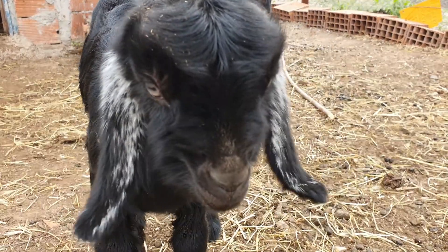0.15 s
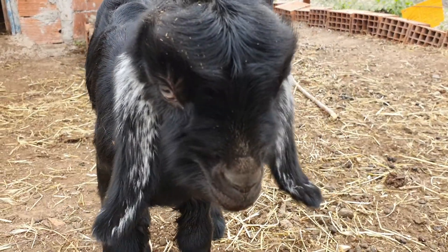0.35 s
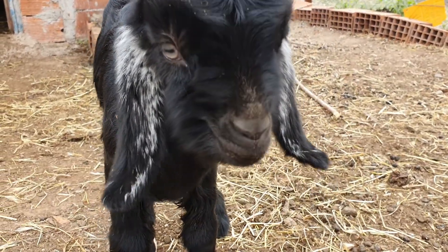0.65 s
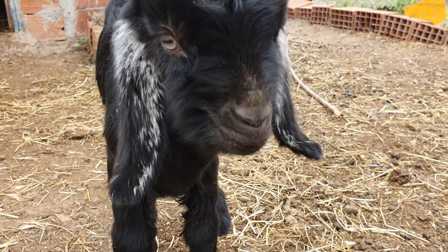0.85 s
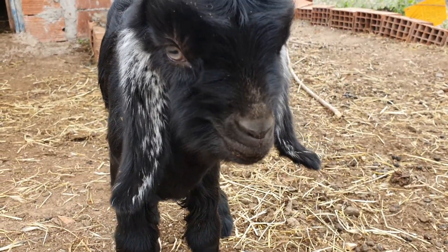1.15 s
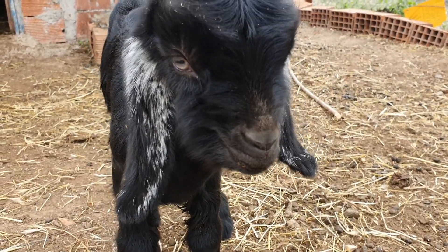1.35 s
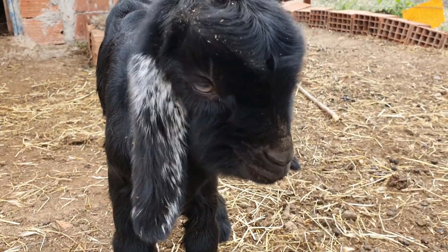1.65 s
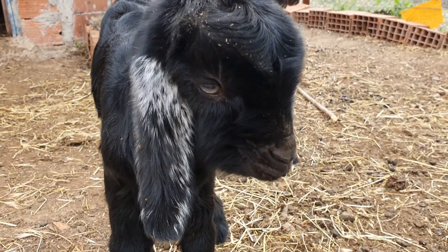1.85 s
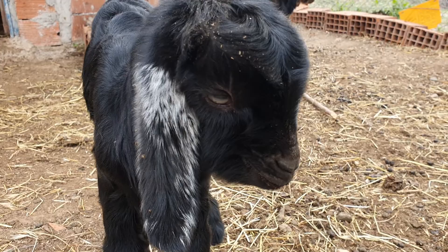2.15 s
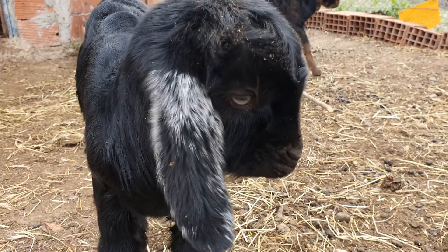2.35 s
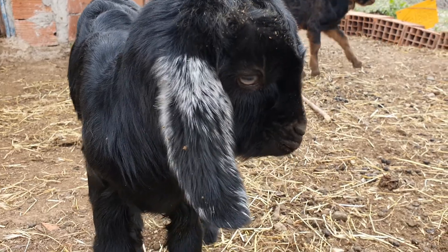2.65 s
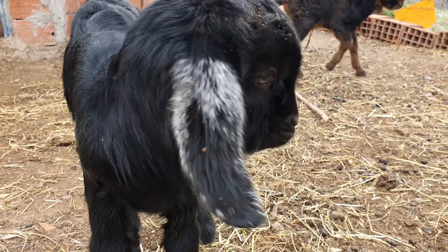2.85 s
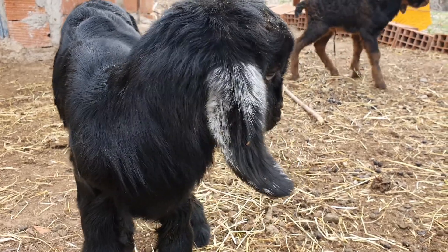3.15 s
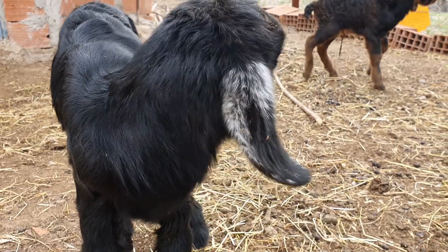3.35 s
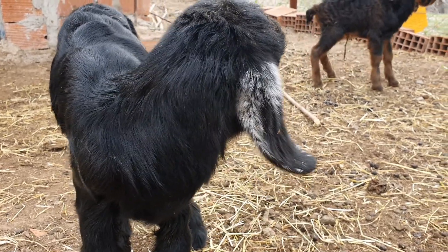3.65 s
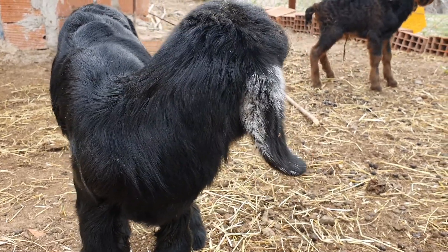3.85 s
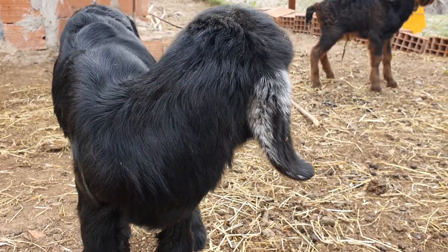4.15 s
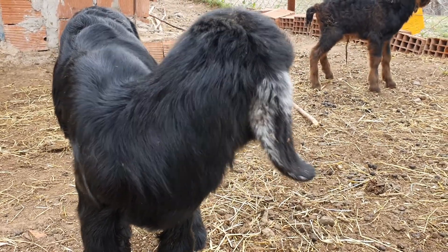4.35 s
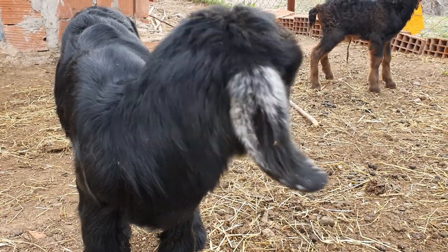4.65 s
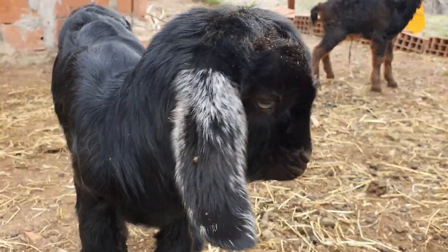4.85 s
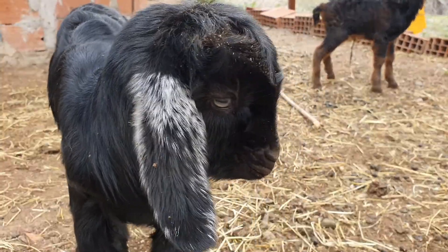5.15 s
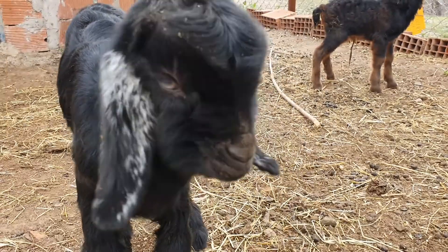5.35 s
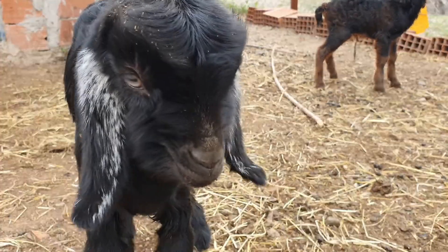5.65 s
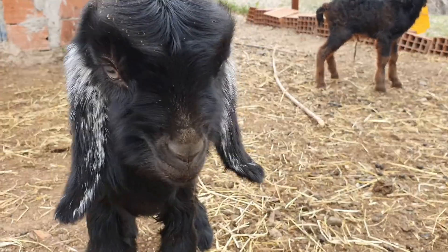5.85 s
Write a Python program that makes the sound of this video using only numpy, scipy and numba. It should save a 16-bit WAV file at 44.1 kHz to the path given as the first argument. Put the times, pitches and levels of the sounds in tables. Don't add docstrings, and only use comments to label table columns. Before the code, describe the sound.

Close handheld outdoor sound: a soft, nasal, trembling kid bleat first, then almost two seconds of bassy wind buffeting shifting between left and right. In a lull comes a second, breathier bleat and a puffing snort. Separate gusts, a few dry straw ticks and quiet airy hiss follow, and a third quavering bleat closes it.

```python
import sys
import numpy as np
from scipy import signal
from scipy.fft import rfft, irfft
from scipy.io import wavfile
from scipy.ndimage import uniform_filter1d
from numba import njit

SR = 44100
rng = np.random.default_rng(int(sys.argv[2]) if len(sys.argv) > 2 else 0)


def put_to_file(sound):
    columns = np.atleast_2d(sound).T
    safe = np.clip(columns, -1, 1)
    whole_steps = np.round(safe * 32767)
    wavfile.write(sys.argv[1], SR, whole_steps.astype(np.int16))


def nominal_scale(level):
    x = np.asarray(level, float) / 20
    return 10 ** x


N = 264864
T = np.arange(N) / SR
F = np.fft.rfftfreq(N, 1 / SR)


def level(x, db):
    return x * nominal_scale(db) / np.sqrt(np.mean(x ** 2))


@njit
def svf(x, hz, width):
    y, b, l = np.empty(len(x)), 0., 0.
    g, k = np.tan(np.pi * hz / SR), width / hz
    for i in range(len(x)):
        v = (b + g * (x[i] + 1e-18 - l)) / (1 + g * (g + k))
        b, l, y[i] = 2 * v - b, l + 2 * g * v, k * v
    return y


def resonate(x, hz, width):
    hz, width = float(hz), float(width)
    return svf(svf(x, hz, width), hz, width)


def smooth_twice(x, size):
    return uniform_filter1d(uniform_filter1d(x, size), size)


def walk(rate):
    k = int(SR / rate)
    held = np.repeat(rng.standard_normal(N // 20)[:N // k + 1], k)
    return 1.3619 * smooth_twice(held, k)[:N]


def columns(table):
    s, *cols = np.transpose(table)
    return [np.interp(T, s, c) for c in cols]


def gate(table, fade_s=0.017):
    return np.clip(np.minimum(T - table[0][0], table[-1][0] - T) / fade_s + .5, 0, 1)


def colour(table, hz):
    f, db = np.transpose(table)
    return nominal_scale(np.interp(np.log(np.maximum(hz, 1)), np.log(f), db))


def peaks(times, dbs, spans):
    return np.array([nominal_scale(2 * (db - 10 * np.abs(T - s) / span)) for s, db, span in zip(times, dbs, spans)])


def split(pan_db):
    return np.vstack((pan_db, -pan_db)) / 2


# (start [s], held [s], top pitch [Hz], voice level [dB], breath level [dB])
FIRST_PUSHES = [
    (.155, 0.03029, 370.2, -77, -70),
    (.27, 0.01427, 396.8, -67, -69),
    (.37, 0.01554, 409.4, -63, -69),
    (.468, 0.01179, 427, -62, -70),
    (.55, .225, 410.9, -64, -70.5),
]
SECOND_PUSHES = [
    (3.11, .004, 386, -60, -63.5),
    (3.212, .012, 423.2, -57, -59),
    (3.303, .006, 423, -57.5, -62.5),
    (3.388, .008, 418.7, -66.5, -64),
    (3.45, 0.033, 400, -82, -66),
]
THIRD_PUSHES = [
    (5.615, .012, 420.4, -66.5, -69.5),
    (5.733, .008, 424.5, -61.5, -71.5),
    (5.818, .008, 422.6, -63, -67),
    (5.912, .01, 426, -60, -64),
    (5.995, .01, 409.6, -62, -64),
]
# (frequency [Hz], level [dB])
FIRST_THROAT = [(300, -2.5), (410, 1), (820, -9), (1230, -8), (1640, -7), (2050, -16), (2900, -9),
                (3750, -16), (4500, -13), (5000, -7), (5700, -19), (6250, -9), (6800, -7), (7500, -19.5),
                (8700, -18), (9500, -23), (9900, -62)]
SECOND_THROAT = [(300, 10.5), (420, -7.5), (850, -25), (1270, -22), (1690, -11), (2100, -21), (2700, -20),
                 (3350, -24), (3800, -16), (4250, -19), (5050, -27), (5900, -17), (6600, -15.5),
                 (7600, -24), (8600, -28), (10300, -52)]
THIRD_THROAT = [(300, 2), (410, 3.5), (820, -8), (1240, -3), (1660, -2), (2050, -12), (3300, -22),
                (3750, -2), (4150, -8), (4600, -19), (5300, -11), (5800, -12), (6300, -7), (7200, -11.5),
                (8300, -36), (10300, -56)]
# (time [s], frequency [Hz], level over breath [dB])
FIRST_NOSE = [(.13, 7100, 2), (.2, 7000, 0), (.27, 6750, -3), (.5, 6800, -3), (.8, 7000, -5),
              (.86, 7200, -3)]
SECOND_NOSE = [(3.09, 6200, 0), (3.14, 7200, 0), (3.19, 6300, -2), (3.245, 7400, 1), (3.285, 6500, -2),
               (3.33, 7400, 0), (3.39, 7350, 3), (3.46, 7400, -3), (3.56, 6900, 0)]
THIRD_NOSE = [(5.595, 6300, 2), (5.645, 7350, 4), (5.71, 6900, -2), (5.76, 7200, 4), (5.85, 7250, 3),
              (5.9, 7200, 1), (6.0, 7050, 1)]
# (pitch sag [Hz], time to sag [s], voice loss [dB/s], breath loss [dB/s], tremble [dB])
FIRST_SLACK = (14, .027, 52.77, 110, 1.889)
SECOND_SLACK = (24, .025, 560, 400, 0)
THIRD_SLACK = (25, 0.03, 241, 149, 0)


def bleats():
    first = bleat(FIRST_PUSHES, FIRST_SLACK, FIRST_THROAT, FIRST_NOSE, jitter=.0025, pan_db=2)
    second = bleat(SECOND_PUSHES, SECOND_SLACK, SECOND_THROAT, SECOND_NOSE, jitter=.004, pan_db=2)
    third = bleat(THIRD_PUSHES, THIRD_SLACK, THIRD_THROAT, THIRD_NOSE, jitter=.005, pan_db=2)
    return first + second + third


# (frequency [Hz], level [dB])
BREATH_COLOUR = [(900, -32), (4000, -24), (6200, -13), (6900, -8), (7300, -7), (7800, -11), (9000, -18),
                 (9600, -15), (9900, -42)]


def bleat(table, slack, throat, nose, jitter, pan_db):
    hz, voice_db, breath_db, open_mouth = pushes(table, *slack)
    hz = uniform_filter1d(hz, size=SR // 60)
    slide = np.abs(uniform_filter1d(np.gradient(hz) * SR, size=SR // 50))
    unsteady_hz = hz * (1 + jitter * (1 + slide / 300) * walk(250))
    phase = 2 * np.pi * np.cumsum(unsteady_hz) / SR
    on, voice = open_mouth > 0, np.zeros(N)
    for k in range(1, 25):
        swell = nominal_scale(1.8 * walk(33)[on])
        voice[on] += colour(throat, k * hz[on]) * swell * np.cos(k * phase[on] + .06 * k * k)
    voice /= svf(voice, 5789.5, 4500.0)[on].std()
    flutter = nominal_scale(1.6 * walk(55))
    puffs = rng.standard_normal(N) * (1 + .8 * np.cos(phase))
    air = irfft(rfft(puffs) * colour(BREATH_COLOUR, F), N)
    breath = level(air, -4.5) + whistle(nose)
    call = voice * nominal_scale(voice_db - 3.0) + breath * nominal_scale(breath_db)
    return ports(call * flutter * open_mouth, pan_db)


def pushes(table, sag_hz, sag_s, voice_loss, breath_loss, tremble_db):
    breath_lag_s, lead_s, tail_s = 0.012, .03, 0.08537
    tremble_per_s, tremble_top_s, tremble_hz_per_db = 21.7, .62, 1.3517
    release_db_per_s = 400.5

    def away(lag):
        gaps = [np.maximum(s + lag - T, T - s - lag - held) for s, held, *_ in table]
        return np.min(np.maximum(gaps, 0), axis=0)

    ends = [(s + end * held, *rest) for s, held, *rest in table for end in (0, 1)]
    hz, voice_db, breath_db = columns(ends)
    last_s = table[-1][0] + table[-1][1]
    tremble = tremble_db * np.cos(2 * np.pi * tremble_per_s * (T - tremble_top_s))
    sag = sag_hz * (1 - np.exp(-(away(0) / sag_s) ** 2))
    release_db = release_db_per_s * np.maximum(T - last_s, 0)
    return (hz + tremble_hz_per_db * tremble - sag,
            voice_db + tremble - voice_loss * away(0) - release_db,
            breath_db - breath_loss * away(breath_lag_s),
            gate([(table[0][0] - lead_s,), (last_s + tail_s,)]))


def whistle(table):
    hz, db = columns(table)
    slow = smooth_twice(rng.standard_normal((2, N)), int(SR / 600))
    phase = 2 * np.pi * np.cumsum(hz) / SR
    return level(slow[0] * np.cos(phase) + slow[1] * np.sin(phase), 0) * nominal_scale(db - 3)


# (time [s], peak level [dB], time to lose 10 dB [s])
SNORT_PUFFS = [
    (3.455, -51, .032),
    (3.49, -60, .03),
    (3.553, -58, .04),
]
# (frequency [Hz], width [Hz], level [dB])
NOSTRIL_MODES = [(950, 600, -4), (1850, 900, 2), (2500, 600, -3), (3300, 1100, -1), (4300, 1100, -9),
                 (8900, 1000, -21)]
NOSTRILS_OPEN = [(3.42,), (3.62,)]


def snort():
    opposed = .3 * rng.standard_normal(N) * np.array([[1], [-1]])
    air = (rng.standard_normal((2, N)) + opposed) * nominal_scale(2.5 * walk(90))
    nose = np.zeros((2, N))
    for hz, width, db in NOSTRIL_MODES:
        nose += nominal_scale(db) * np.array([resonate(v, hz, 0.76 * width) for v in air])
    puffs = np.sqrt(peaks(*np.transpose(SNORT_PUFFS)).sum(axis=0))
    return nominal_scale(split(-3)) * level(nose, 0) * puffs * gate(NOSTRILS_OPEN)


# (frequency [Hz], width [Hz], rate [1/s], scatter [dB], port likeness [-1..1])
EDDY_SIZES = [(67.043, 60.183, 150, 5.5, 0.11935), (175.7, 140.65, 300, 6, -0.49578),
              (400, 439.2, 600, 5, -0.5657)]


def wind():
    *size_db, pan_db = buffeting()
    out = np.zeros((2, N))
    for (*eddy, like), db in zip(EDDY_SIZES, size_db):
        left, own = eddies(*eddy), eddies(*eddy)
        right = like * left + np.sqrt(1 - like ** 2) * own
        out += np.array([left, right]) * nominal_scale(split(pan_db) + db + 1.5)
    return out


# (time [s], large eddies [dB], left minus right [dB])
STEADY_WIND = [(0, -46.5, -4.5), (.5, -47.5, 8.5), (.6, -34, 3.5), (1.2, -32.5, 1), (1.37, -43.5, 4),
               (1.45, -32, 4), (2.4, -33, -2.5), (2.6, -42, -3.5), (2.92, -44, 5), (2.98, -53.5, 1.5),
               (3.62, -59, -7), (3.95, -53, 8), (4.45, -34.5, 7.5), (4.62, -47, -8.5), (4.86, -50, 8),
               (5.0, -39, 0.5), (5.5, -35.5, -4), (5.64, -56, 0)]
# (time [s], peak level [dB], time to lose 10 dB [s], left minus right [dB])
GUST_PEAKS = [(.47, -38, 0.0152, 8.5), (.61, -29.5, 0.0173, 2.5), (.78, -28.5, 0.0616, -6.5),
              (.85, -23, 0.0163, 2.5), (.96, -23.5, 0.0358, -10.5), (1.04, -28, 0.0227, 3.5),
              (1.14, -25, 0.0355, -3.5), (1.3, -27, 0.0311, -4), (1.44, -23.5, 0.0144, 7),
              (1.55, -21.5, 0.0739, -6.5), (1.68, -27, 0.0058, 4.5), (1.77, -24.5, 0.0415, 3.5),
              (1.93, -24.5, 0.0522, -1.5), (2.121, -27.5, 0.0278, -3), (2.28, -28, 0.0386, -1.5),
              (2.49, -27.5, 0.0321, -6), (2.69, -23, 0.0601, -8), (2.826, -20.5, 0.0556, 8),
              (3.09, -42, 0.03, 1.5), (3.72, -44, 0.0015, -3.5), (3.81, -25.5, 0.0401, -1),
              (4.2, -30.5, 0.0472, 4), (4.31, -20.5, 0.0481, 8), (4.93, -33.5, 0.0233, 2),
              (5.16, -24, 0.0563, 0), (5.26, -27.5, 0.0579, -8), (5.42, -23, 0.0165, -1),
              (5.51, -28, 0.0263, 3), (5.74, -27, 0.0302, 6), (5.88, -39, 0.0334, 9)]
# (time [s], middle eddies [dB], small eddies [dB], time to lose 10 dB [s])
BREAKING_SWIRLS = [(.14, -68, -56, 0.0908), (.57, -47.5, -63, 0.0012), (.73, -37, -61, 0.0552),
                   (.855, -24, -49, 0.029), (1.17, -28, -40.5, 0.0373), (1.26, -24, -46, 0.0385),
                   (1.36, -23, -30, 0.0389), (1.63, -28, -64, 0.039), (1.71, -29, -55.5, 0.0208),
                   (2.0, -32, -54, 0.0572), (2.12, -40, -52, 0.05), (2.37, -40.5, -58, 0.0241),
                   (2.52, -46.5, -57.5, 0.0205), (2.655, -29.5, -55.5, 0.0306), (2.764, -33, -62, 0.0342),
                   (2.865, -31, -62, 0.0375), (3.6, -53, -62, 0.1149), (4.19, -41.5, -63.5, 0.0166),
                   (4.31, -38, -64.5, 0.052), (5.19, -40, -58.5, 0.0285), (5.4, -28, -50, 0.033),
                   (5.47, -43, -63, 0.0058)]


def buffeting():
    s, db, span, lean = np.transpose(GUST_PEAKS)
    gusts = peaks(s, db, span)
    steady_db, steady_lean = columns(STEADY_WIND)
    steady = nominal_scale(2 * steady_db)
    power = steady + gusts.sum(axis=0)
    large = 10 * np.log10(power)
    s, middle_db, small_db, span = np.transpose(BREAKING_SWIRLS)
    middle = nominal_scale(2 * (1.3985 * large - 5)) + peaks(s, middle_db, span).sum(axis=0)
    small = nominal_scale(2 * (0.19666 * large - 55)) + peaks(s, small_db, span).sum(axis=0)
    pan_db = (lean @ gusts + steady_lean * steady) / power
    return large, 10 * np.log10(middle), 10 * np.log10(small), pan_db


def eddies(hz, width, rate, scatter_db):
    thumps = (rng.random(N) < rate / SR) * rng.standard_normal(N) * nominal_scale(scatter_db * walk(30))
    bump = np.exp(-(F / (2.2646 * hz)) ** 2)
    x = resonate(irfft(rfft(thumps) * bump, N), hz, 1.1987 * width)
    return x / np.sqrt(smooth_twice(x ** 2, SR // 8) + 0.1455 * x.var())


# (time [s], peak level [dB], frequency [Hz], left minus right [dB])
PORT_GULPS = [(0.845, -32.5, 102.3, 8), (0.95, -22.5, 97.37, -10.5), (1.087, -22, 118.9, 2.5),
              (1.557, -18, 100.8, -7.5), (1.613, -15.5, 109.9, -16.5), (1.89, -22, 100.3, -10.5),
              (1.946, -33.5, 100.4, -21), (2.114, -29, 159.8, 10.5), (2.22, -33, 118.3, 8),
              (2.252, -29.5, 139.2, -14.5), (2.279, -21.5, 98.44, -11.5), (2.359, -21, 112.9, 7.5),
              (2.656, -18.5, 123.5, -12.5), (2.755, -22.5, 109.8, -12.5), (4.174, -26.5, 99.65, 17.5),
              (4.289, -23, 98.84, -4), (4.907, -35, 96.5, 2), (5.353, -40, 121.5, -5),
              (5.4, -25.5, 102.5, -18)]


def pops():
    out, t = np.zeros((2, N + 2000)), np.arange(2000) / SR
    for s, db, hz, pan_db in PORT_GULPS:
        rise = 1 - np.exp(-(t * hz / 0.437) ** 2)
        cycle = np.sin(2 * np.pi * hz * t) * np.exp(-t * hz / 1.3584) * rise
        i = int(s * SR)
        out[:, i:i + 2000] += cycle * nominal_scale(db + 0.81 * split(pan_db))
    return out[:, :N]


# (time [s], peak level [dB], frequency [Hz], length [s], left minus right [dB])
EDGE_FLAPS = [(0.95, -45, 420, 0.00989, -9), (1.052, -36, 309.1, 0.00662, -8),
              (1.099, -33.5, 360.4, 0.0076, -3), (1.126, -53, 305, 0.0065, -5),
              (1.149, -26.5, 442, 0.013, -5), (1.174, -28.5, 463, 0.00699, 1),
              (1.217, -31, 287.5, 0.02359, -8), (1.242, -39, 295.9, 0.0069, 22.5),
              (1.279, -46.5, 324.5, 0.006, 13.5), (1.302, -33.5, 293, 0.0084, -1),
              (1.337, -30.5, 419, 0.0059, 0), (1.362, -28, 348, 0.012, -3), (1.429, -44, 388, 0.0061, 8),
              (1.539, -39, 313, 0.006876, -2), (1.621, -48, 416, 0.014, -6.5),
              (1.691, -44, 336, 0.005466, -8), (1.753, -50, 420, 0.0091, 12),
              (1.887, -40, 305.2, 0.03113, -4), (2.711, -42, 480, 0.007, -6.0),
              (5.309, -51, 450, 0.0052, -8), (5.402, -45, 320, 0.008025, -11.5)]


def flaps():
    out, t = np.zeros((2, N + 4000)), np.arange(4000) / SR
    for s, db, hz, length, pan_db in EDGE_FLAPS:
        noise = rng.standard_normal((2, 4000))
        noise[1] = -.6 * noise[0] + .8 * noise[1]
        burst = noise * (t / length) ** 0.16 * np.exp(-t / length)
        flap = np.array([svf(resonate(v, hz, 0.8231 * hz), 1. * hz, 1.683 * hz) for v in burst])
        i = int(s * SR)
        out[:, i:i + 4000] += flap / np.abs(flap).max() * nominal_scale(db + 5 + 1.2255 * split(pan_db))
    return out[:, :N]


# (time [s], peak level [dB], frequency [Hz], 60 dB decay time [s], left minus right [dB])
STRAW_TICKS = [(.36, -53, 2000, 0.0306, -5), (0.796, -59.5, 8050, 0.015, -6),
               (1.344, -62, 2150, 0.014, 13.5), (2.149, -62, 4442, 0.08469, 2.5),
               (2.165, -58, 4998, 0.03403, -5.5), (2.175, -46.5, 2560, 0.053, -7),
               (2.176, -46, 1282, 0.02113, -7.5), (2.434, -68, 4850, 0.047, 3.5),
               (2.49, -60, 3500, 0.13, -1.5), (2.518, -55, 6600, 0.068, -3.5),
               (2.581, -52.5, 2894, 0.044, -9.5), (2.63, -60.5, 3500, 0.018, -1.5),
               (3.515, -58.5, 11080, 0.02, -2), (5.244, -57, 3000, .03, -4), (5.249, -55, 2500, .03, -4),
               (5.253, -52, 2900, .03, -4), (5.258, -59, 2500, .03, -4), (5.272, -54, 1000, .03, -3),
               (5.316, -66, 2600, .06, 0), (2.519, -61, 12500, .06, -3), (2.43, -66, 14000, .05, 0),
               (5.89, -62, 2498, 0.2372, -9)]


def straw():
    out, t = np.zeros((2, N + 4000)), np.arange(4000) / SR
    for s, db, hz, t60, pan_db in STRAW_TICKS:
        width = 0.575 * hz * np.sqrt(hz / 3008)
        noise = rng.standard_normal((2, 4000))
        noise[1] = 0.19 * noise[0] + 0.51 * noise[1]
        burst = noise * np.exp(-np.log(1000) * t / t60) * np.minimum(t / 0.0028, 1)
        tick = np.array([resonate(v, hz, 1.1 * width) for v in burst])
        i = int(s * SR)
        out[:, i:i + 4000] += tick / np.abs(tick).max() * nominal_scale(db + 4 + split(pan_db))
    return out[:, :N]


# (start [s], length [s], from [Hz], to [Hz], level [dB])
BIRD_NOTES = [
    (1.03, .13, 1880, 2070, -73.5),
    (1.42, .06, 2013, 2050, -77),
    (4.33, .1, 2100, 2280, -83),
]


def bird():
    out = np.zeros(N)
    for s, length, from_hz, to_hz, db in BIRD_NOTES:
        note = [(s, from_hz), (s + length, to_hz)]
        tone = np.sin(2 * np.pi * np.cumsum(columns(note)[0]) / SR)
        out += tone * nominal_scale(db + 5 + 1.5 * walk(37)) * gate(note)
    return ports(out, -7.)


# (frequency [Hz], level per Hz [dB])
YARD_COLOUR = [(110, -26.5), (150, 0), (314, -5.5), (480, -19), (800, -18.5), (1500, -25.5), (2500, -25.5),
               (3800, -28), (4400, -35.5), (7500, -34.5), (8200, -47), (10000, -46.5), (15500, -45)]
# (time [s], level [dB])
BREEZE_SWELL = [(0, 3.5), (1.2, 1), (2.6, 2), (3.6, 0.5), (4.7, -0.2417), (6.006, 1.2353)]


def yard():
    shared = ports(rng.standard_normal(N), 0.51)
    noise = 0.4071 * shared + 1.2086 * rng.standard_normal((2, N))
    air = rfft(noise) * colour(YARD_COLOUR, F) * (F > 120)
    out = np.zeros((2, N))
    for hz in 140 * 2 ** np.arange(0, 7.5, .5):
        band = np.clip(1 - np.abs(2 * np.log2(np.maximum(F, 1) / hz)), 0, 1)
        out += irfft(air * band, N) * nominal_scale(1.721 * walk(13))
    return level(out, -63 + 3.5) * nominal_scale(columns(BREEZE_SWELL)[0])


def walls(x):
    t = np.arange(4000) / SR
    t60_s, echo_db = .07, -7.5
    echo = rng.standard_normal((2, 4000)) * np.exp(-np.log(1000) * t / t60_s)
    return x + signal.fftconvolve(x, level(echo, echo_db) / np.sqrt(4000), axes=1)[:, :N]


# (frequency [Hz], left port phase lead [rad])
PORT_LEAD = [(0, 0), (400, -1.1), (850, -2.8), (1250, -3.8), (1700, -4), (2400, -4.3), (3100, -3.7),
             (3700, -3.8), (4200, -4.3), (5000, -6.4), (6200, -7), (7000, -7.8), (7500, -8.7), (8300, -11),
             (9600, -11.5), (16000, -30)]
# (frequency [Hz], left port gain over right [dB])
BODY_SHADE = [(400, -6.5), (1300, 6.5), (2800, -9), (3900, -9.5), (5000, -3), (6900, 5), (8200, 2),
              (9400, -11)]


def ports(x, pan_db):
    hz, radians = np.transpose(PORT_LEAD)
    shade, spectrum = np.sqrt(colour(BODY_SHADE, F)), rfft(x)
    lead = np.exp(1j * np.interp(F, hz, radians))
    left = irfft(spectrum * shade * lead, N)
    right = irfft(spectrum / shade, N)
    return np.array([left, right]) * nominal_scale(split(pan_db))


def scene():
    kid = walls(nominal_scale(-0.7651) * (bleats() + snort()))
    wind_on_ports = wind() + pops() + flaps()
    around = straw() + bird() + yard()
    return kid + wind_on_ports + around


def roll_off(x):
    return signal.sosfilt(signal.butter(12, 16780, fs=SR, output="sos"), x)


def record(dry):
    trimmed = signal.sosfilt(signal.butter(1, 22, "high", fs=SR, output="sos"), dry)
    mix = np.tanh(1.4864 * trimmed) / 1.1051
    return roll_off(mix)


dry = scene()
out = record(dry)
put_to_file(out)
```